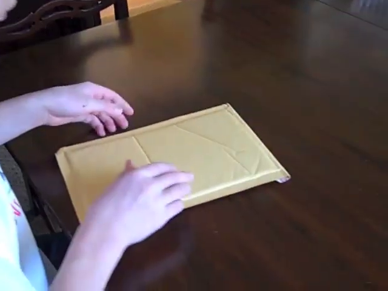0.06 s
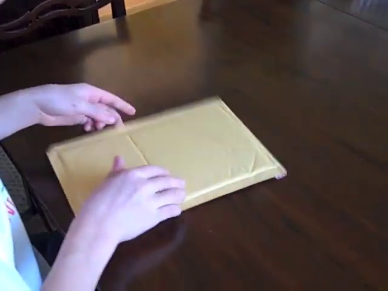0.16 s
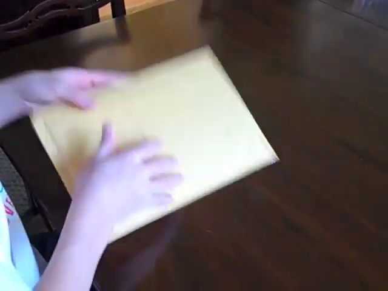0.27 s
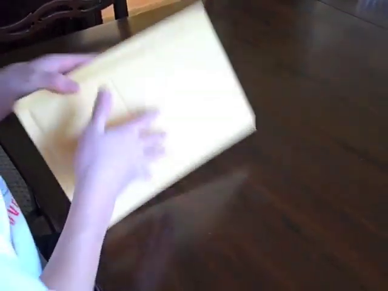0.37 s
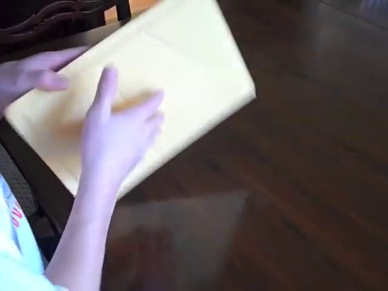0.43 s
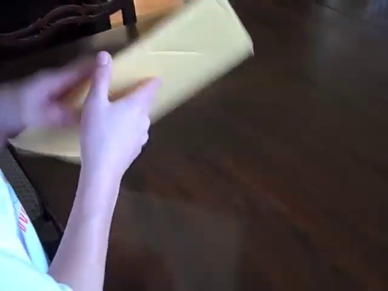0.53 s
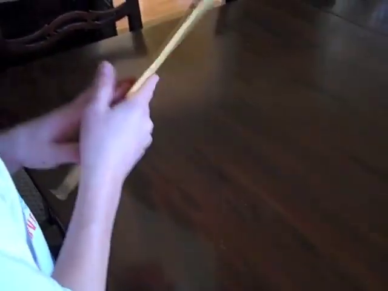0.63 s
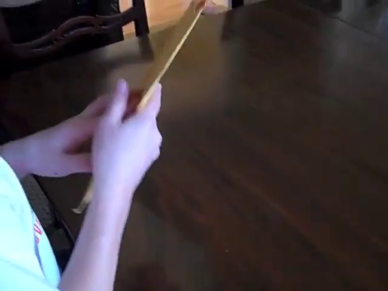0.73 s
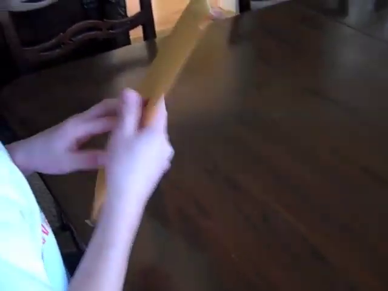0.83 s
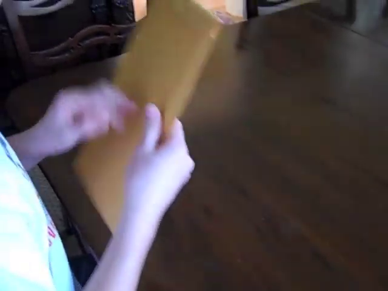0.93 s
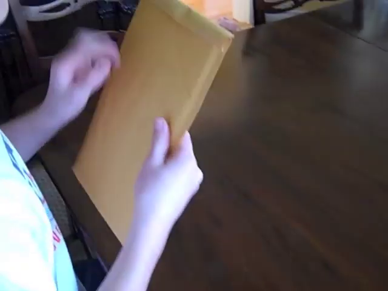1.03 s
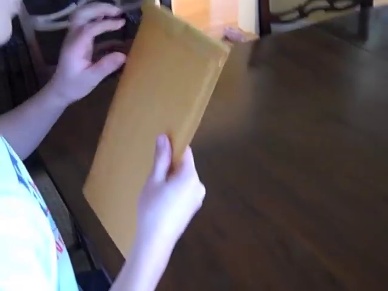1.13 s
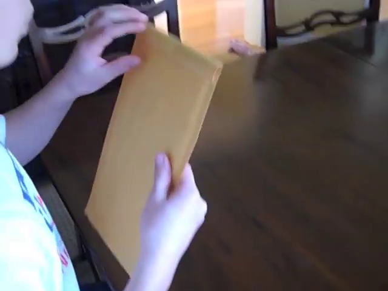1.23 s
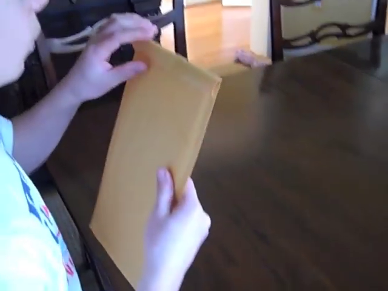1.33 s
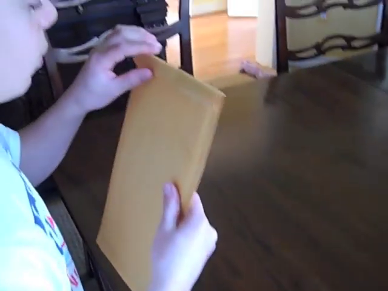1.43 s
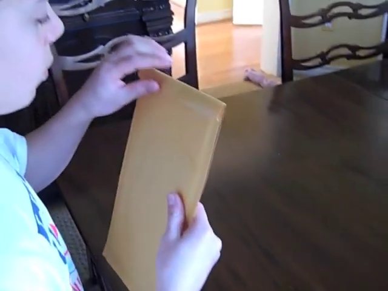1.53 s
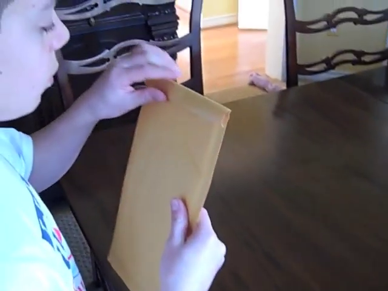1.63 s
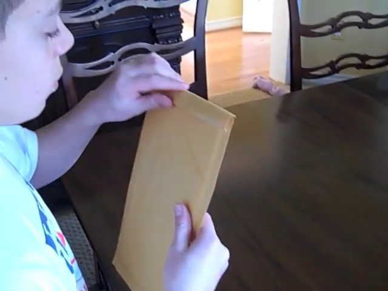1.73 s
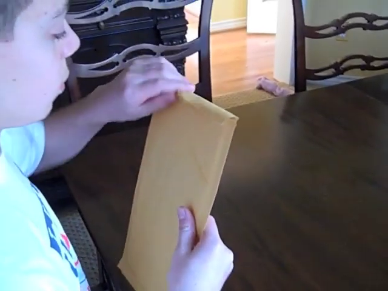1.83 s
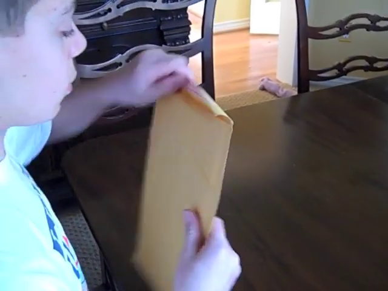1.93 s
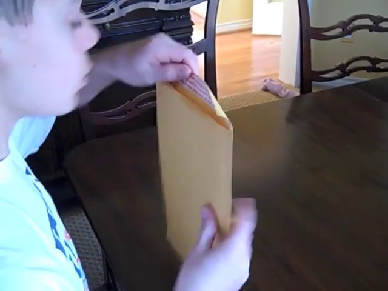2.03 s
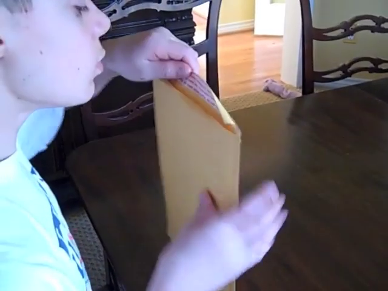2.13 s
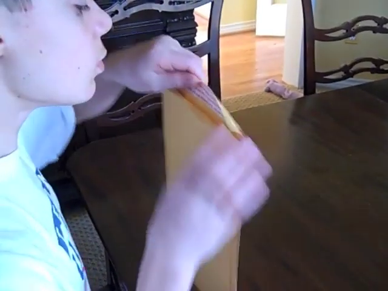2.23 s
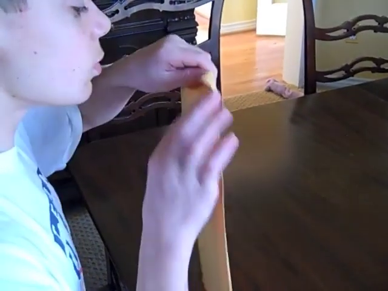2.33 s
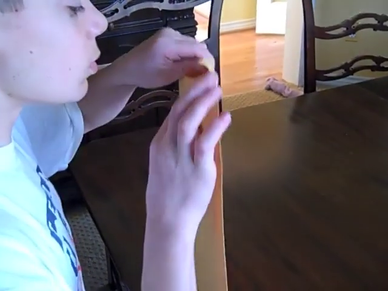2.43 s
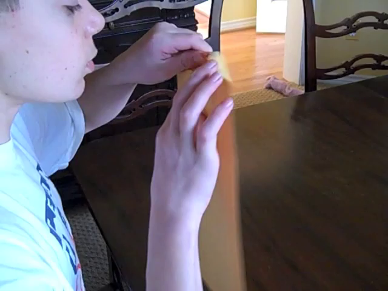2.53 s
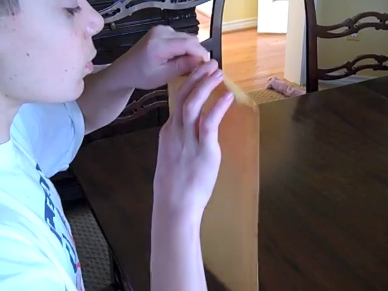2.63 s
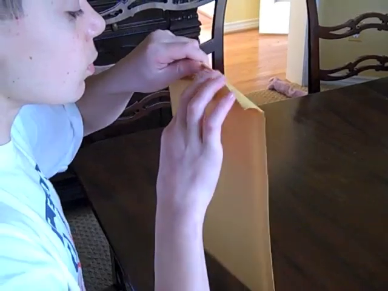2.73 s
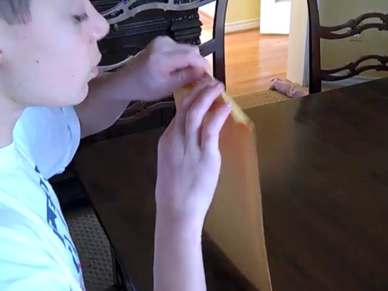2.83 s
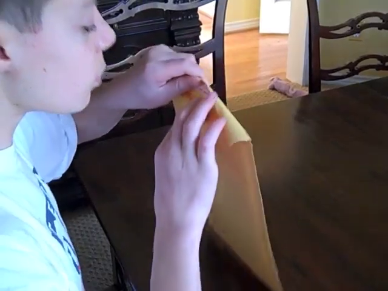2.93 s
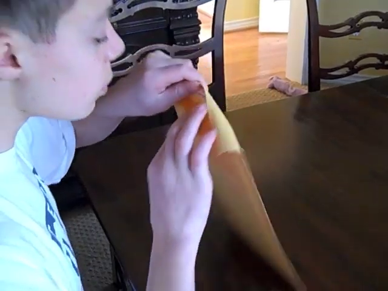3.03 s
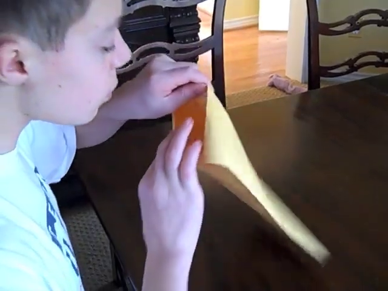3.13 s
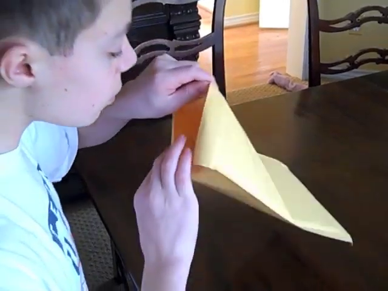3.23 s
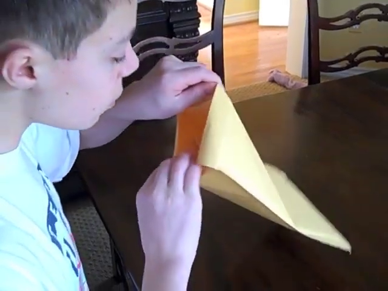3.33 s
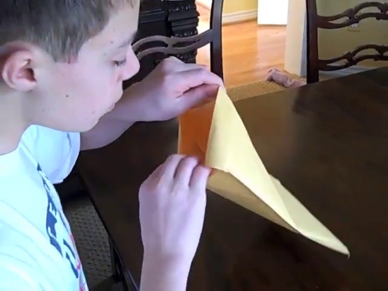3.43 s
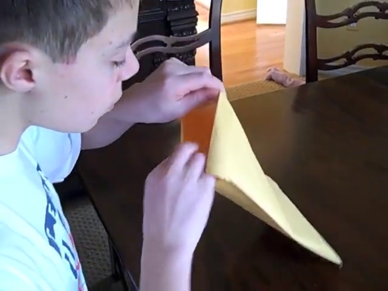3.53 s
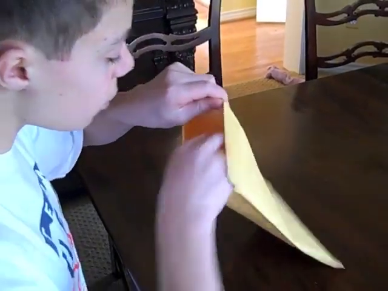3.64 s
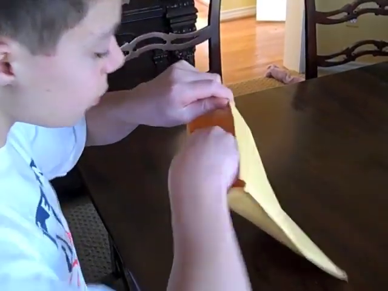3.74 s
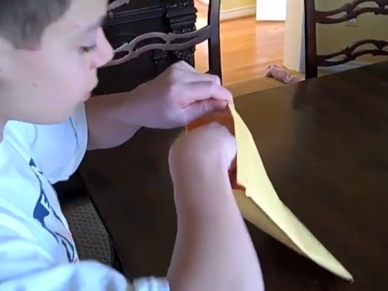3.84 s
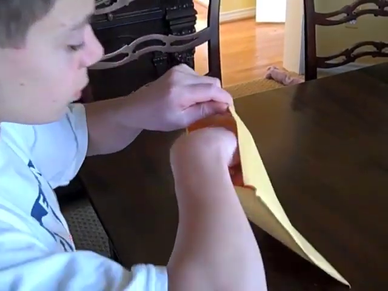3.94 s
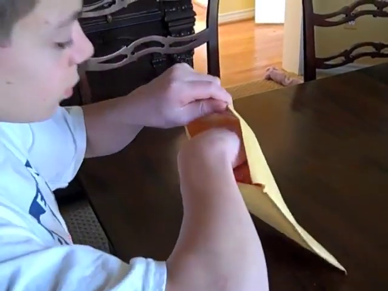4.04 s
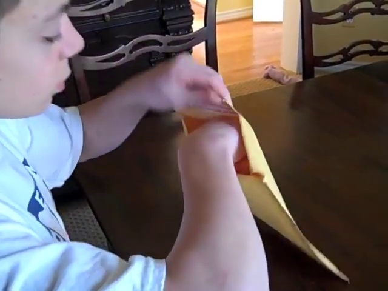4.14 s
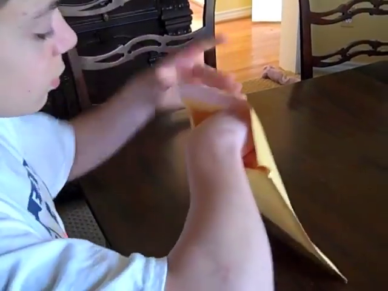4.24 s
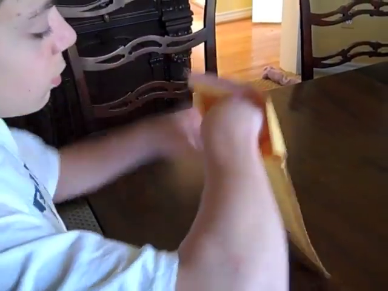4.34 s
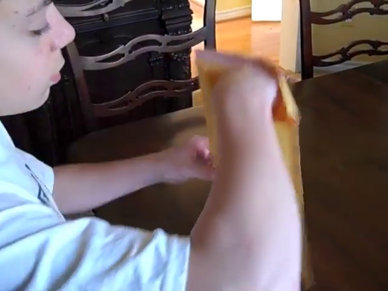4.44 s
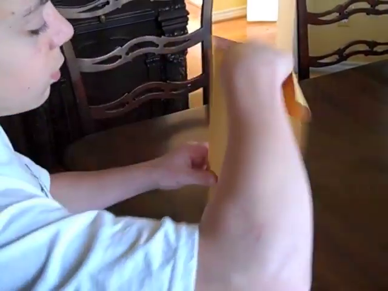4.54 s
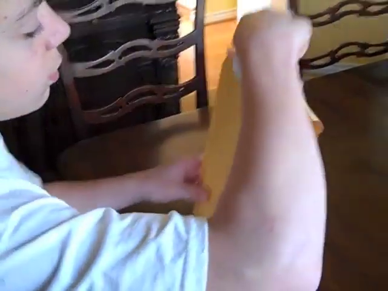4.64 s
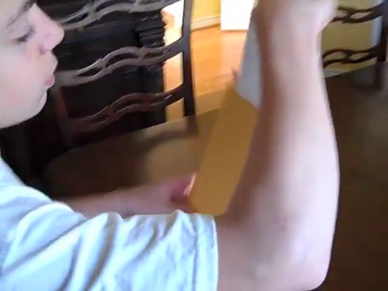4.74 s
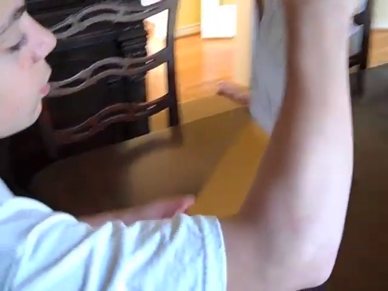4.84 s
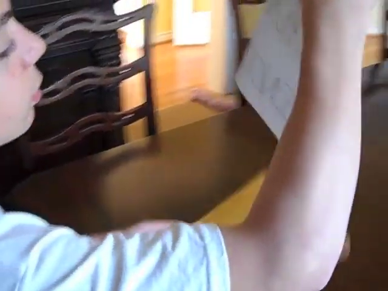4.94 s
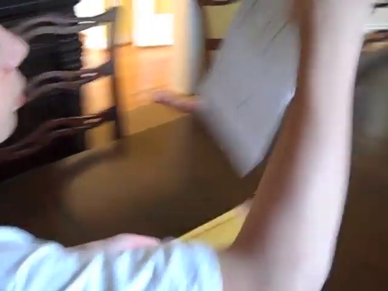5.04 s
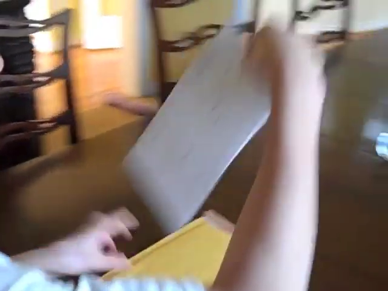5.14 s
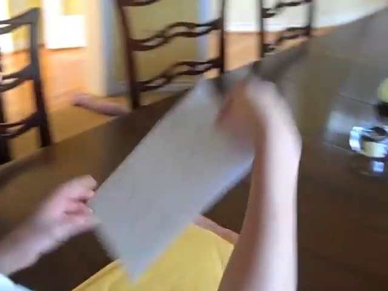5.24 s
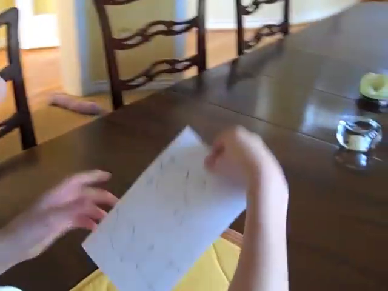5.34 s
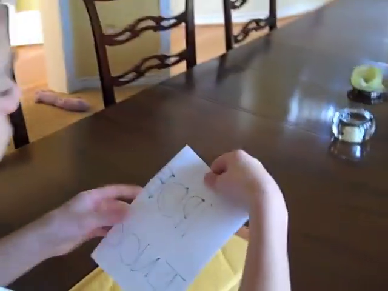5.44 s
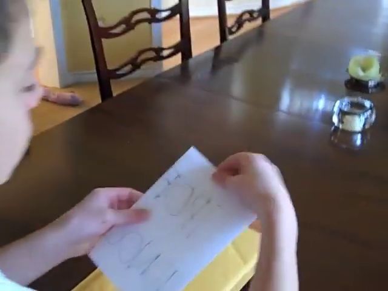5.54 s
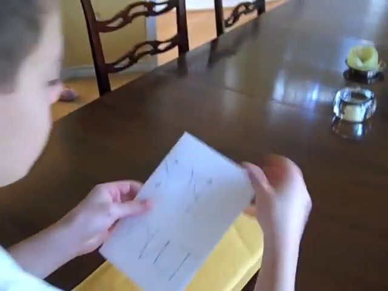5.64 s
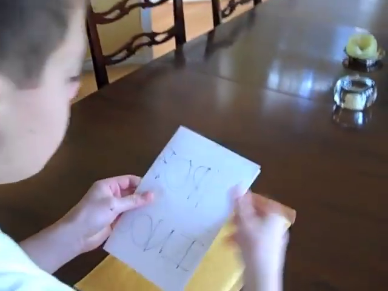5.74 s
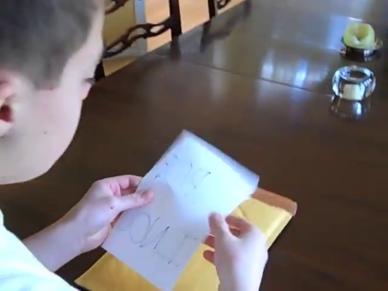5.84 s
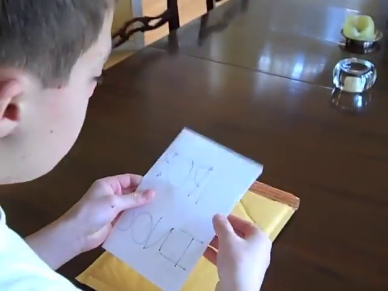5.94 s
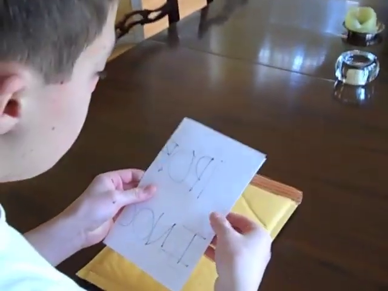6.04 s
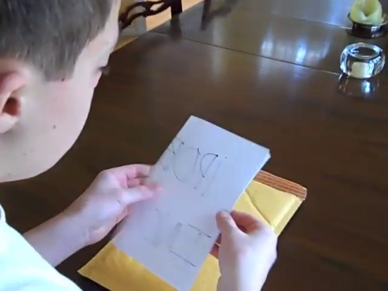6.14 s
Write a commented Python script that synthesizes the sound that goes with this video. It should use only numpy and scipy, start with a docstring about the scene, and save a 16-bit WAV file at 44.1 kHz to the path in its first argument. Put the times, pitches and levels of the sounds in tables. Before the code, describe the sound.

Close, crisp rustling and snapping of a stiff padded envelope in a quiet room, building to a loud rubbing pull and then small paper taps.

```python
"""A padded paper envelope is lifted, torn open and emptied at a table, close to a small camera.
Creases and low knocks, each a noise crack plus a short ring, over clumped crackle, flexing sheet, hollow pouch.
The paper gets a quiet room's answer, then passes two microphone ports that ring at different pitches.
Behind it: shaped-noise room air, a far appliance's hum as narrow noise bands, soft sine jolts of the table."""
import sys
import numpy as np
from scipy import signal
from scipy.fft import rfft, irfft, next_fast_len
from scipy.io import wavfile
from scipy.ndimage import uniform_filter1d, map_coordinates

SR = 44100
rng = np.random.default_rng(int(sys.argv[2]) if len(sys.argv) > 2 else 0)


def file_out(sig):
    """Save sig as 16-bit WAV at sys.argv[1]."""
    # one column per channel
    cols = np.atleast_2d(sig).T
    # limit, then scale
    lim = np.clip(cols, -1, 1)
    pcm = np.round(lim * 32767).astype(np.int16)
    wavfile.write(sys.argv[1], SR, pcm)


N = 272538


def amp(db):
    """Decibels to gain."""
    return 10 ** (np.asarray(db) / 20)


def unit(x):
    """Scale to rms 1."""
    return x / np.sqrt(np.mean(x ** 2) + 1e-20)


def along(points, hz, axis=1):
    """Interpolate one column of (f/Hz, ..) points on a log frequency axis."""
    columns = np.transpose(points)
    return np.interp(np.log(hz + 1), np.log(columns[0] + 1), columns[axis])


def wobble(knots_per_s):
    """Smooth random curve through random knots."""
    knots = rng.standard_normal(int(N * knots_per_s / SR) + 4)
    return map_coordinates(knots, [np.arange(N) * knots_per_s / SR])


def filtered(x, response):
    """Multiply the spectrum of x by a response of frequency."""
    m = next_fast_len(N + SR // 2)
    return irfft(rfft(x, m) * response(np.fft.rfftfreq(m, 1 / SR)), m)[..., :N]


def widen(pair, alike, spectrum):
    """Mix two unrelated signals to left and right with set colour and likeness per frequency."""
    def mid_side(hz):
        turn = np.arccos(np.clip(along(alike, hz), 0, 1)) / 2
        return amp(along(spectrum, hz)) * [np.cos(turn), np.sin(turn)]
    mid, side = filtered(pair, mid_side)
    return np.array([mid + side, mid - side])


# port cavities, left then right: f/Hz, width/Hz, housing shade corner f/Hz
PORT_CAVITIES = [(7890, 1200, 11500), (6770, 775, 8600)]


def ports(x):
    """Each port's cavity resonates at its own pitch and falls away above; the left is a little farther."""
    cavity_hz, width_hz, shade_hz = np.transpose(PORT_CAVITIES)[:, :, None]
    lag_s = np.array([[.000012], [0]])

    def response(f):
        cavity = cavity_hz ** 2 / (cavity_hz ** 2 - f * f + 1j * f * width_hz)
        mesh = 1 / (1 + 1j * f / 24000) ** 3
        shade = 1 / np.sqrt(1 + (f / shade_hz) ** 10)
        return cavity * mesh * shade * np.exp(-2j * np.pi * f * lag_s)
    return filtered(x, response)


# room air before the ports: f/Hz, relative level/dB per Hz
AIR_SPECTRUM = [(12, -39), (20, 5), (148, 5.5), (443, -4), (1160, -13), (1700, -13.5), (7870, -36),
                (14000, -40)]
# air at the two ports: f/Hz, left-right likeness [0..1]
AIR_LIKENESS = [(30, 0.66), (140, 0.54), (2000, 0)]
# tilt of the air: f/Hz, left over right level/dB
AIR_LEFT_TILT = [(100, -0.5), (600, 5), (3000, 9)]
AIR_DB = -57


def air():
    """Room air: shaped noise, more alike left and right in the bass, with a slow unsteadiness."""
    wash = ports(widen(rng.standard_normal((2, N)), AIR_LIKENESS, AIR_SPECTRUM))
    halves = np.array([[.5], [-.5]])
    wash = filtered(wash, lambda hz: amp(along(AIR_LEFT_TILT, hz) * halves))
    return amp(AIR_DB + 0.81 * wobble(3.12)) * unit(wash)


# appliance tones: f/Hz, half-width to 1/e/Hz, level/dB rms
HUM_BANDS = [(120.05, 2.6, -65), (143, 7.8, -62), (197.4, 7.4, -67)]


def hum():
    """Far appliance: narrow noise bands heard as wavering low tones."""
    out = np.zeros(N)
    for hz, width_hz, db in HUM_BANDS:
        band = filtered(rng.standard_normal(N), lambda f: np.exp(-((f - hz) / width_hz) ** 2))
        out += amp(db) * unit(band)
    return out


# table jolts: t/s, f/Hz, peak level/dB midway between the ports, half-length to -20 dB/s
TABLE_JOLTS = [(0.319, 43, -47, 0.037), (0.524, 199, -41, 0.017), (0.575, 192, -35, 0.0043)]


def thuds():
    """Table jolts under the camera: low sines in a bell; the deepest shake the right port most."""
    t = np.arange(N) / SR
    lean_db_hz = np.array([[-150], [150]])
    out = np.zeros((2, N))
    for s, hz, db, half_s in TABLE_JOLTS:
        level_db = db + lean_db_hz / hz - 20 * ((t - s) / half_s) ** 2
        out += amp(level_db) * np.sin(2 * np.pi * hz * (t - s))
    return out


# paper and room sound at the two close ports: f/Hz, left-right likeness [0..1]
LIKENESS = [(300, 0.98), (1500, 0.94), (4500, 0.44), (8000, 0.43), (13000, 0.13)]
# room answer: f/Hz, level/dB against the direct sound, t60/s
ROOM_ANSWER = [(200, -9.5, 0.16), (1540, -7, 0.12), (5000, -15, 0.028), (12100, -7, 0.13)]


def room(x):
    """Wall reflections as decaying noise, shortest near 5 kHz; a new tail every third of a second."""
    out, step = np.zeros((2, N + SR)), SR // 3
    delay = 130  # samples
    for a in range(0, N, step):
        hz, t, z = signal.stft(rng.standard_normal((2, SR // 2)), SR, nperseg=256)
        fade = amp(-60 * t / along(ROOM_ANSWER, hz, axis=2)[:, None])
        fade_norm = np.linalg.norm(fade, axis=1)[:, None]  # one energy per band
        tail = signal.istft(z * fade / fade_norm, SR, nperseg=256)[1]
        wet = signal.fftconvolve(x[:, a:a + step], tail / np.linalg.norm(tail[0]), axes=1)
        out[:, a + delay:][:, :wet.shape[1]] += wet
    return widen(out[:, :N], LIKENESS, ROOM_ANSWER)


def bursts(per_s, spread_db, t60_s, smooth):
    """Envelope of uneven breaks, instant start and fast decay, over a share of smooth rubbing."""
    size_db = spread_db * np.clip(rng.standard_normal(N), -2, 2)
    hits = (rng.random(N) < per_s / SR) * amp(2 * size_db)
    power = signal.lfilter([1], [1, -amp(-120 / (t60_s * SR))], hits)
    smooth = np.clip(smooth, 0, 1)
    return np.sqrt((1 - smooth) * power / power.mean() + smooth)


def buckles(count, hz, octaves, cycles, spread_db):
    """Small facets pop over, each ringing a few cycles at its own pitch."""
    at = rng.integers(N, size=(2, count, 1))
    pitch, size = np.clip(rng.standard_normal((2, 2, count, 1)), -2, 2)
    n = np.arange(SR // 100 * 2)
    f = hz * 2 ** (octaves * pitch)
    decay = np.exp(-3 * n / SR * f / cycles)
    rings = amp(spread_db * size) * np.sqrt(f) * decay * np.sin(2 * np.pi * f * n / SR)
    sides = [np.bincount((a + n).ravel(), r.ravel(), N + len(n))[:N] for a, r in zip(at, rings)]
    return unit(np.array(sides))


def patchy(pair, depth_db):
    """Different parts of the paper sound by turns: colour shifts in patches of about 600 Hz by 40 ms."""
    z = signal.stft(pair, nperseg=512)[2]
    field = rng.standard_normal(z.shape[1:])
    for axis in (0, 1):
        field = uniform_filter1d(field, size=7, axis=axis)
    return signal.istft(z * amp(depth_db * unit(field)), nperseg=512)[1][:, :N]


# moves of the hands: peak t/s, swell/s, hold/s, then drive level/dB of crackle, flexing sheet, hollow pouch,
# and tautness: upper over lower sheet voice/dB
HAND_MOVES = [(.01, 0.011, 0.0041, -75, -54.5, -49, -11), (0.14, 0.017, 0.16, -42, -49, -53.5, 2.5),
              (0.25, 0.045, .12, -37.5, -44, -65, 8.5), (0.52, 0.29, 0.0089, -34, -44.5, -54, 5.5),
              (0.557, 0.02, 0.0017, -26, -37.5, -50.5, 13), (0.669, 0.04, 0.049, -42, -55.5, -69, 12),
              (0.852, 0.18, 0.12, -39.5, -52, -60, 15), (1.28, .025, 0.12, -54.5, -78, -82, 9),
              (1.457, 0.037, 0.015, -58, -66, -65, 9), (1.822, 0.47, 0.011, -52, -77, -78, 11),
              (1.844, 0.013, 0.032, -38, -51, -57, 4.5), (1.959, 0.12, 0.13, -41.5, -50, -57.5, 5.5),
              (2.168, 0.065, .003, -39.5, -57.5, -59, 12), (2.248, 0.0056, 0.0091, -39, -46.5, -51.5, 3.5),
              (2.298, 0.044, .005, -39.5, -47.5, -60, 8), (2.395, .006, .02, -71, -54, -53.5, -6),
              (2.45, 0.011, 0.099, -53, -51.5, -56.5, 18), (2.554, 0.11, 0.014, -36, -49, -54.5, 0),
              (2.717, 0.06, 0.14, -42.5, -52, -74, 4.5), (2.913, 0.11, 0.053, -48, -56.5, -60, 18),
              (2.988, 0.032, 0.16, -30.5, -39, -74, 12), (3.078, 0.075, 0.19, -28.5, -40.5, -54.5, 4.5),
              (3.527, 0.1, 0.054, -34.5, -42.5, -51, -1.5), (3.61, 0.04, 0.03, -31.5, -42, -46, 1),
              (3.657, 0.066, .003, -22, -32.5, -39, 0.5), (3.724, 0.11, 0.09, -34, -47.5, -51, 4.5),
              (3.912, 0.076, 0.079, -32, -42, -54.5, 6.5), (4.064, .05, 0.077, -43, -51.5, -60, 5),
              (4.133, 0.008, 0.021, -29.5, -37, -44, 0.5), (4.212, 0.0073, 0.014, -43, -42.5, -48.5, -2),
              (4.283, 0.062, 0.025, -62, -52, -51, 0), (4.41, 0.037, 0.022, -35, -41.5, -48, 4.5),
              (4.571, 0.19, 0.015, -25.5, -36.5, -44, 2.5), (4.607, 0.2, 0.13, -24, -39.5, -69, 25),
              (4.78, 0.19, 0.098, -29, -38.5, -50, 2), (4.974, 0.046, 0.055, -50, -53, -54, 2),
              (5.079, 0.021, 0.02, -39, -45.5, -48, -2.5), (5.162, 0.011, 0.0075, -69, -48.5, -53, 8),
              (5.424, 1, 0.0056, -54, -60, -61, -1), (5.482, 0.021, 0.0028, -29.5, -42, -66, 3),
              (5.562, 0.17, 0.075, -72, -54, -53.5, -16), (5.784, 0.013, 0.048, -58, -50.5, -59, -24),
              (5.846, 0.057, .003, -36, -53, -59, -2), (5.864, 0.029, 0.0028, -57, -35, -47, -5),
              (5.954, 0.069, 0.18, -56, -59, -58.5, -1)]
# paper merely held: drive level/dB of crackle, sheet, pouch
HELD_DB = (-60.5, -64, -64)
SWELL_DB, FADE_DB_PER_S = 25, 231  # rise over one swell time; fall after the hold
SHEET_FOLLOWS, POUCH_FOLLOWS = 0.79, 0.84  # share of the crackle's dB swing
LIFT_S = .13  # held-paper floor is 20 dB lower until here


def moves():
    """Drive/dB of crackle, slack sheet, taut sheet, pouch: moves swell, hold, fade; powers add."""
    columns = np.transpose(HAND_MOVES)[:, :, None]
    peak_s, swell_s, hold_s, crackle_db, sheet_db, hollow_db, taut_db = columns
    t = np.arange(0, N, 32) / SR
    rise_db = SWELL_DB * np.clip(peak_s - t, 0, None) / swell_s
    fade_db = FADE_DB_PER_S * np.clip(t - peak_s - hold_s, 0, None)
    shape_db = -rise_db - fade_db
    upper = 1 / (1 + amp(-2 * taut_db))  # power share of the taut voice
    crackle = amp(2 * (crackle_db + shape_db))
    sheet = amp(2 * (sheet_db + SHEET_FOLLOWS * shape_db))
    hollow = amp(2 * (hollow_db + POUCH_FOLLOWS * shape_db))
    powers = [crackle, (1 - upper) * sheet, upper * sheet, hollow]
    held = amp(2 * np.array(HELD_DB))[[0, 1, 1, 2]] * [1, .5, .5, 1]
    rest = np.outer(held, .01 + (t > LIFT_S))
    times = np.arange(N) / SR
    return [np.interp(times, t, 10 * np.log10(p.sum(axis=0) + r)) for p, r in zip(powers, rest)]


# crackle: f/Hz, relative level/dB per Hz
CRACKLE_SPECTRUM = [(2000, -14), (3500, -9.5), (4500, -1), (9800, -1), (13000, -12)]
# sheet, slack voice then taut voice: f/Hz, relative level/dB per Hz
SHEET_SPECTRA = [
    [(300, -19.5), (850, 2.5), (1300, -1.5), (1900, -2.5), (3000, -27)],
    [(1000, -58), (1900, -6), (2600, 0), (4200, -2), (6500, -13.5)],
]
# hollow pouch: f/Hz, relative level/dB per Hz
HOLLOW_SPECTRUM = [(80, -11), (200, 2), (400, -0.5), (700, -4.5), (1200, -28.5)]
# finest fizz: f/Hz, relative level/dB per Hz
FIZZ_SPECTRUM = [(8000, -22), (10000, -8), (14000, 9)]
# finest fizz, also the bright edge of each crack: t/s, relative level/dB
FIZZ_CURVE = [(0, -12), (.9, -20.5), (1.3, -24), (1.85, -12), (2.3, -13.5), (2.8, -15), (3.1, -21),
              (3.65, -12.5), (4.1, -19.5), (4.7, -11.5), (5.3, -18.5), (6.18, -27)]
# pouch drawn open, then sheet sliding out; more rubbing than crackling: start t/s, end t/s
SLIDES = [(3.03, 3.16), (4.57, 5.3)]


def rustle():
    """Hands drive fine crackle, the flexing sheet and the hollow padded pouch; breaks clump the grain."""
    crackle_db, slack_db, taut_db, hollow_db = moves()
    t = np.arange(N) / SR
    fizz_db = np.interp(t, *np.transpose(FIZZ_CURVE))

    def noise():
        return rng.standard_normal((2, N))

    def layer(pair, spectrum):
        return unit(widen(pair, LIKENESS, spectrum))

    sliding = sum(np.abs(t - (a + b) / 2) < (b - a) / 2 for a, b in SLIDES)
    clumps = bursts(450, 3.9, 0.023, smooth=0.39 + 0.5 * sliding) * amp(1.22 * wobble(30))
    fibres = clumps * bursts(1500, 3.1, 0.0042, smooth=0.61 + .5 * sliding)

    crackle = amp(-12.5) * layer(patchy(noise(), 2.4), CRACKLE_SPECTRUM)
    crackle += amp(fizz_db + 15.5) * layer(noise(), FIZZ_SPECTRUM)

    facets = buckles(count=2500, hz=1890, octaves=0.895, cycles=6.9, spread_db=4.5)
    rub = patchy(facets + 4.3 * noise(), 2.06)
    sheet = amp(slack_db) * layer(rub, SHEET_SPECTRA[0]) + amp(taut_db) * layer(rub, SHEET_SPECTRA[1])

    pops = buckles(count=600, hz=371.5, octaves=0.81, cycles=3.8, spread_db=1)
    hollow = amp(hollow_db) * layer(pops + 4.5 * noise(), HOLLOW_SPECTRUM)
    # duller layers are less grainy
    return fibres * amp(crackle_db) * crackle + fibres ** 0.71 * sheet + fibres ** 0.39 * hollow


# lesser creases: mid level over the crackle drive, mid ring over crack, mid pitch
SMALL_SNAP_DB, SMALL_RING_DB, SMALL_RING_HZ = 9, -18.5, 2510


def small_snaps(count):
    """Lesser creases at random moments outside the slides, louder where the crackle is louder."""
    when, size, ring, pitch = rng.random((count, 4)).T
    s = .01 + when * (N / SR - .01)
    in_slide = [any(a < v < b for a, b in SLIDES) for v in s]
    s = np.where(in_slide, when * SLIDES[0][0], s)  # those landing in a slide move before the first slide
    db = moves()[0][(s * SR).astype(int)] + SMALL_SNAP_DB + 10 * (size - .5)
    ring_db = SMALL_RING_DB + 16 * (ring - .5)
    return np.transpose([s, db, ring_db, SMALL_RING_HZ * 2 ** (.9 * (pitch - .5))])


# clearest creases, and low knocks or taps on the envelope:
# t/s, relative crack level/dB, relative ring over crack level/dB, ring f/Hz
CREASES_AND_KNOCKS = [(0.1383, -37.5, 6, 1190), (0.1471, -33, 1, 4200), (0.2455, -43.5, 15, 1130),
                      (0.2475, -40.5, 11.5, 4000), (0.259, -25.5, 3.5, 704), (0.299, -36.5, 14, 2550),
                      (0.3108, -32, 4.5, 637), (0.4635, -25, -13, 1970), (0.511, -51, 20, 260),
                      (0.5127, -18.5, -10, 2280), (0.5631, -13.5, -10.5, 1890), (0.6212, -39, -21, 3700),
                      (0.7965, -41, 1, 4600), (0.839, -30, -11, 3900), (0.859, -22, -24, 2490),
                      (0.9477, -21, -24, 2810), (0.9568, -16.5, -15, 2380), (0.992, -35, 0, 4500),
                      (1.014, -29, -9, 4060), (1.034, -37, -6, 4530), (1.047, -40, -7, 3200),
                      (1.08, -39, -16, 3000), (1.1357, -34.5, -17, 3000), (1.2, -38, -12, 615),
                      (1.2181, -33.5, -15, 516), (1.2808, -32, -11, 2960), (1.3241, -34.5, -26, 3040),
                      (1.4693, -32.5, -17, 2940), (1.5018, -29.5, -26, 3870), (1.8155, -33, -26, 4200),
                      (1.8345, -14, -25, 990), (1.8586, -15.5, -31, 3830), (1.8854, -27.5, -9, 3740),
                      (1.9065, -46, 13, 423), (1.969, -26.5, -10, 3500), (1.9905, -50, 16, 1020),
                      (1.997, -29, -18, 3500), (2.0313, -26.5, -24, 3830), (2.2468, -27.5, -2.5, 670),
                      (2.292, -31, -4, 2500), (2.3006, -25.5, -7, 3080), (2.393, -44.5, 11.5, 524),
                      (2.3935, -45, 15, 3450), (2.5338, -26, -3, 2210), (2.5735, -32.5, 0, 596),
                      (2.6068, -28, -20, 3000), (2.669, -35, -8, 1530), (2.8014, -24, -16, 4020),
                      (2.8263, -25, -36, 2710), (2.9183, -24, -21, 3580), (2.9754, -27, -9, 3300),
                      (2.9855, -19, -23, 2500), (3.0498, -15, -26, 2120), (3.0857, -14, -7, 1800),
                      (3.1653, -4.5, -26, 2880), (3.171, -22, -10, 960), (3.2105, -27, -19, 3480),
                      (3.2216, -11, -17.5, 820), (3.426, -28.5, -9, 2720), (3.4425, -28.5, -14, 2820),
                      (3.4786, -28.5, -4, 2820), (3.5016, -13, -38, 2570), (3.5066, -25, -20, 2500),
                      (3.5195, -20.5, -6.5, 825), (3.533, -20.5, -8.5, 3570), (3.5775, -26.5, 0, 2110),
                      (3.6184, -15, -11, 2500), (3.657, -14, -3.5, 4200), (3.659, -14, -5, 1000),
                      (3.6845, -31, 6, 1480), (3.7952, -19, -13, 2300), (3.692, -17, -20, 2850),
                      (3.9745, -26.5, 2.5, 1850), (4.0543, -16.5, -26, 2330), (4.0832, -19.5, -23, 4160),
                      (4.101, -25, -19, 2930), (4.1185, -24, -20, 4000), (4.1332, -21, -14, 1500),
                      (4.1408, -16, -21, 2500), (4.1495, -15, -19, 2520), (4.153, -22, -6, 3000),
                      (4.1582, 0, -26.5, 3860), (4.1612, -18, -11, 1500), (4.2134, -13.5, -11.5, 1730),
                      (4.2148, -46.5, 20.5, 517), (4.2203, -47.5, 18.5, 412), (4.2265, -25, -5, 3500),
                      (4.2617, -17, -12, 4200), (4.2625, -49.5, 18.5, 396), (4.283, -49.5, 16.5, 420),
                      (4.4178, -12, -7, 3130), (4.4922, -34, 13, 1930), (4.508, -17.5, -22, 1960),
                      (4.5438, -22, -3, 645), (4.5534, -18.5, -1.5, 940), (4.555, -14.5, 0, 2430),
                      (4.7404, -24, 3, 2550), (4.8266, -17, -20, 2300), (4.8375, -17, -1.5, 2480),
                      (4.8586, -3.5, -14, 2070), (4.8602, -10.5, -8.5, 3720), (4.872, -27, 12, 2200),
                      (4.969, -31, -9, 2370), (5.0802, -33, 7, 1600), (5.4562, -22.5, -15, 3540),
                      (5.476, -12, -17, 1450), (5.48, -10.5, -32, 1540), (5.555, -43.5, 12, 1570),
                      (5.6022, -51.5, 17.5, 2620), (5.603, -50, 14, 1300), (5.617, -49.5, 14.5, 585),
                      (5.6523, -36, -25.5, 484), (5.7852, -24.5, -4.5, 3620), (5.858, -21, 3.5, 3700),
                      (5.8645, -42.5, 23, 2830), (5.8665, -19.5, 12, 2820), (5.8695, -28, 6, 1590),
                      (5.944, -33, -14, 3500), (6.013, -38, -5, 770), (6.0865, -24.5, -20.5, 1060)]


def snaps():
    """Each crease or knock: a crack of about two milliseconds, a trail of fibres, a short panel ring."""
    out, t = np.zeros((2, N + SR)), np.arange(SR // 10) / SR
    rise_s = 0.00042
    swell = t / rise_s * np.exp(1 - t / rise_s)
    trail = swell + amp(-17.5 - 60 * t / 0.059)
    bands_hz = [(3950, 9000), (10460, 21000), (524, 4000)]  # crack, edge, puff
    bands = [signal.butter(2, hz, "bandpass", fs=SR) for hz in bands_hz]
    apart = [.35, .5, .15]  # left-right difference per band
    for s, db, ring_db, hz in [*CREASES_AND_KNOCKS, *small_snaps(count=55)]:
        common, differing = rng.standard_normal((2, len(bands), len(t)))
        common[:2, round(rise_s * SR)] += 6  # one sharp click at the swell's peak
        crack, edge, puff = [signal.lfilter(*b, [n + a * d, n - a * d])
                             for b, n, d, a in zip(bands, common, differing, apart)]
        # cracks of one level carry one energy
        crack = crack / np.sqrt(np.mean((crack * swell) ** 2) / np.mean(swell ** 2))
        onset = 1 - np.exp(-t / 0.000096)
        ring = np.sin(2 * np.pi * hz * t) * amp(-60 * t / (0.0088 + 6 / hz)) * onset
        # the panel keeps trembling near its pitch
        shiver = unit(signal.lfilter(*signal.iirpeak(hz, 5, SR), puff)) * amp(-21.5 - 60 * t / 0.089)
        body = amp(-3.5) * ring + shiver + amp(-11.5 - 60 * t / 0.017) * unit(puff)
        edge_db = 6.5 + np.interp(s, *np.transpose(FIZZ_CURVE))
        sound = amp(-17.5) * crack * trail + amp(edge_db) * unit(edge) * swell + amp(ring_db) * body
        out[:, round((s - .0008) * SR):][:, :len(t)] += amp(db) * sound
    return out[:, :N]


def scene():
    """Paper close by, its room sound, and the background."""
    paper = rustle() + snaps()
    return ports(paper + room(paper)) + air() + hum() + thuds()


TOP_HZ = 14350


def record(dry):
    """The camera adds faint hiss, rounds off the loudest cracks and cuts everything above TOP_HZ."""
    x = dry + amp(-64.0) * rng.standard_normal(dry.shape)
    rounded = x / (1 + np.abs(x / .92) ** 6) ** (1 / 6)
    return filtered(rounded, lambda hz: hz < TOP_HZ)


dry = scene()
out = record(dry)
file_out(out)
```